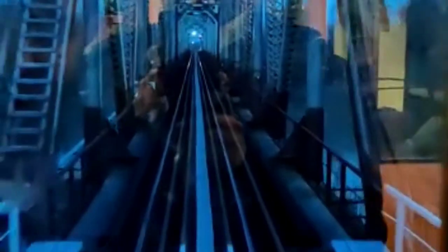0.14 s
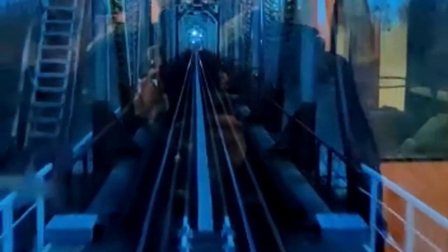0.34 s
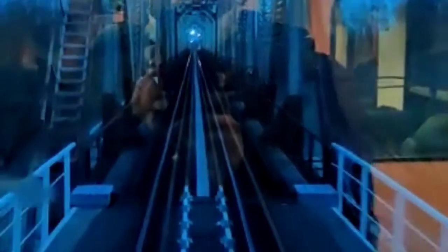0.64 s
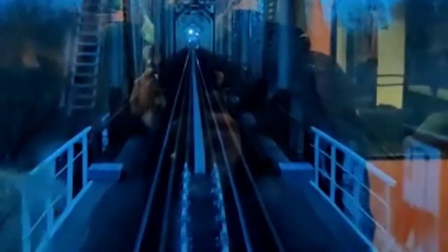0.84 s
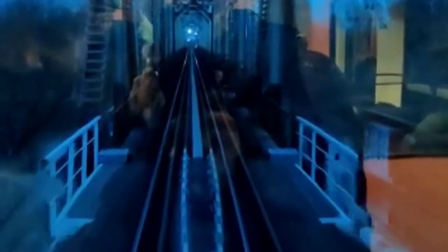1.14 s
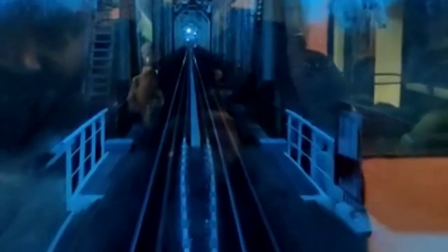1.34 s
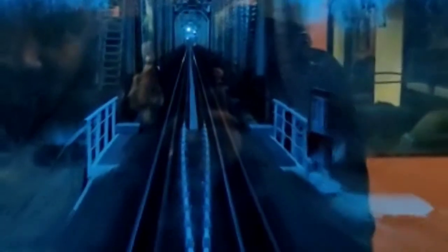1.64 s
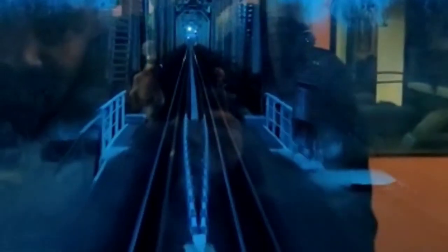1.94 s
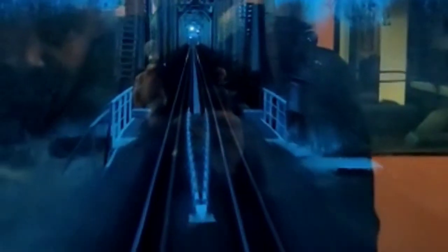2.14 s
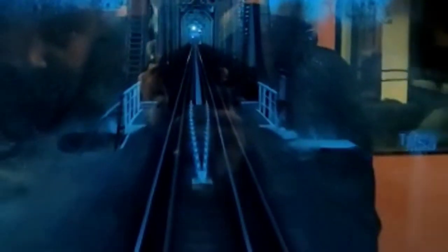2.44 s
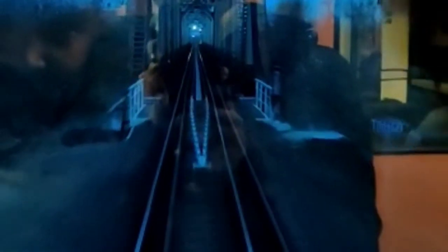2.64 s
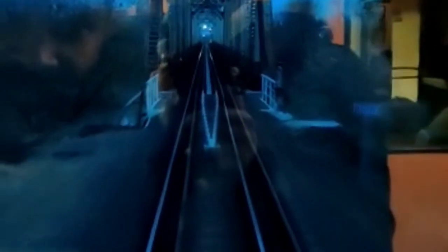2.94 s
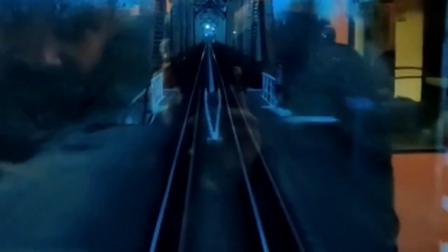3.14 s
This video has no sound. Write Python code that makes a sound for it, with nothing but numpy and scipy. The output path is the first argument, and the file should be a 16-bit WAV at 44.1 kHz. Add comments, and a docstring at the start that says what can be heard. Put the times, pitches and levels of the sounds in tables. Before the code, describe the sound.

Train rumble inside the rear car, continuous, low and rough, with body sway and muffled wheel roar. Bridge boom swells near 0.4 and 0.8 s. Clacks with thuds and brief steel ringing hit at 0.7, 1.0 (sharpest), 1.4 and 1.67 s, the last with a loud panel rattle. Later come deep thumps at 2.1 and 2.45, a duller knock with faint tinny rattle around 2.6-2.7, and unsteady low hum.

```python
"""Rear train car leaving a steel bridge

Inside the car: the body sways and floor modes drone (filtered noise), the bridge booms, the wheels roar
(shaped noise). Rail joints clack (hails of knocks with ring-out), jolts thump the floor (decaying sines),
loose fittings ping (fluttering sines), a hum comes forward on plain track. Two microphone ports:
the left is earlier, and louder below about 6 kHz."""
import sys
import numpy as np
from scipy import signal
from scipy.fft import rfft, irfft, next_fast_len
from scipy.io import wavfile
from scipy.ndimage import map_coordinates

SR = 44100
rng = np.random.default_rng(int(sys.argv[2]) if len(sys.argv) > 2 else 0)


def put_to_file(sound):
    """Save the sound as 16-bit audio at rate SR, in the file named by the first command-line argument."""
    columns = np.atleast_2d(sound).T  # one column per channel
    safe = np.clip(columns, -1, 1)
    whole_steps = np.round(safe * 32767)
    wavfile.write(sys.argv[1], SR, whole_steps.astype(np.int16))


def invert_db(x):
    """Field ratio 10**(x/20) for x, a level in decibels (scalar or array-like)."""
    u = np.asarray(x, float) / 20
    return 10 ** u


N = 145530

# body sway: (time [s], relative level [dB])
SWAY_LEVEL = [(0, -22), (.1, -28.5), (.62, -23), (.8, -15), (.9, -9), (1, -20), (1.06, -11), (1.2, -25),
              (1.64, -14.5), (1.9, -18), (2.42, -27), (2.52, -17.5), (2.85, -27.5), (3.3, -22)]
# floor drone and bridge boom: (time [s], relative drone level [dB], relative boom level [dB])
DRONE_LEVELS = [(0, -22.5, -33.5), (.25, -22, -32), (.42, -21.5, -19), (.68, -19.5, -28), (.83, -24, -13),
                (1.1, -22.5, -28.5), (1.75, -24, -25.5), (2.3, -24, -34), (3.3, -23.5, -42.5)]
# floor resonances: (frequency [Hz], width [Hz], relative level [dB])
FLOOR_MODES = [(29.8, 16.35, -2), (48, 8.4, -3.5), (67.8, 13.63, -3), (91.6, 16.7, -0.5),
               (124.1, 17.35, -6.5), (162.1, 19, -8), (216.2, 19.7, -10), (258.4, 18.1, -10.5),
               (365.6, 13.2, -15.5), (481.5, 24.5, -21.5)]
# wheel roar, its part above 600 Hz: (time [s], level [dB])
ROAR_LEVEL = [(0, -45), (.6, -43), (.95, -42.5), (1.25, -48.5), (1.6, -43), (1.85, -47.5), (2.75, -49),
              (2.95, -47.5), (3.3, -45)]
# roar spectrum: (frequency [Hz], relative density [dB per Hz])
ROAR_SPECTRUM = [(150, -32), (260, 2), (480, -3), (620, -9), (1000, -18), (1280, -16.5), (1550, -24.5),
                 (2400, -29.5), (3500, -37), (16000, -52)]
# wheels over joints: (time [s], level above 600 Hz [dB], length [s], tilt [dB per octave], thud boost [dB])
CLACKS = [(0.009, -38, 0.019, 2, -10.5), (.702, -33, 0.051, 2, 5), (0.965, -42, .02, 4.5, 2.5),
          (.98, -26, 0.037, 1.5, -3.5), (1.381, -35.5, .035, -2, 5), (1.657, -29.5, 0.036, -1.5, 6.5),
          (2.192, -51.5, 0.03, 7.5, -3.5)]
# clack spectrum: (frequency [Hz], relative density [dB per Hz])
CLACK_SPECTRUM = [(70, -40), (140, -8.5), (400, -7), (800, -18), (1250, -16), (1800, -26.5), (2500, -28.5),
                  (3600, -36), (16000, -48)]
# ring-out of the car: (frequency [Hz], t60 [s])
RING_OUT = [(200, 0.76), (1000, 0.35), (5000, 0.33), (12000, 0.13)]
# wheel and rail modes: (frequency [Hz], relative level [dB], t60 [s])
STEEL_MODES = [(1180, -5, 0.26), (1591, -7, 0.71), (1866, -9.5, 0.38), (2700, -7.5, 0.1)]
# jolts that knock a floor panel: (time [s], level [dB], frequency [Hz])
THUMPS = [(0.711, -12.5, 155.4), (1.003, -17.5, 164.5), (1.394, -20.5, 267.8), (1.68, -18, 263),
          (2.11, -11.5, 70.6), (2.224, -21.5, 73.8), (2.456, -12.5, 75), (2.714, -15, 135.8)]
# loose fittings and panels: (time [s], level [dB], frequency [Hz], t60 [s], pitch flutter [Hz])
PINGS = [(.012, -47, 4940, 0.18, 40), (.111, -55.5, 4300, 0.31, 40.2), (.137, -50.5, 4700, 0.17, 80),
         (.305, -53, 4790, 0.16, 250), (0.601, -55, 4470, 1, 222), (0.676, -50, 8260, 0.67, 703),
         (.708, -37.5, 4740, 0.18, 245), (.89, -53, 4740, 1, 179.6), (.988, -33.5, 4720, 0.12, 247),
         (1.382, -48.5, 4540, 0.082, 130), (1.672, -21.5, 778, 0.37, 99.5), (1.671, -27, 8300, .03, 457),
         (2.483, -45, 9200, .06, 202), (2.619, -35.5, 8990, 0.19, 51.5)]
# hum: (time [s], relative level [dB])
HUM_LEVEL = [(0, -40.5), (1.5, -28), (1.8, -23), (2.5, -30), (3.3, -25.5)]
# nominal left-right likeness: (frequency [Hz], likeness [1 = same])
ALIKE = [(50, 1), (110, 0.92), (210, 0.72), (400, 1), (800, 0.25), (5000, 0.14), (14000, 0.25)]
# nominal left minus right, scaled by the port sides: (frequency [Hz], level [dB])
TILT = [(25, 1.2), (150, 2), (1130, 0.5), (3000, 6), (4900, 7.5), (6500, -2)]
# microphone cavity: (frequency [Hz], gain [dB])
PORT_GAIN = [(3500, 0.5), (4800, 6), (5300, 1.5), (6000, -6), (7200, -10), (8400, -7), (10000, -14),
             (13300, -13), (15500, -28.5)]


def unit(x):
    """Scaled to rms 1."""
    return x / np.sqrt(np.mean(x ** 2) + 1e-20)


def along(points, hz):
    """Interpolates (frequency, value) points on a log frequency axis."""
    f, v = np.transpose(points)
    return np.interp(np.log(hz + 1), np.log(f + 1), v)


def curves(rows):
    """One value per sample for each column after the time."""
    s, *cols = np.transpose(rows)
    return [np.interp(np.arange(N) / SR, s, c) for c in cols]


def wobble(knots_per_s):
    """Smooth random curve through normal knots."""
    knots = rng.standard_normal(int(N * knots_per_s / SR) + 4)
    return map_coordinates(knots, [np.arange(N) * knots_per_s / SR])


def filtered(x, response):
    """x times a complex response of frequency."""
    n = x.shape[-1]
    m = next_fast_len(n + SR // 2)
    return irfft(rfft(x, m) * response(np.fft.rfftfreq(m, 1 / SR)), m)[..., :n]


def mode(f, hz, width_hz):
    """Response of one causal resonance."""
    return 1j * f * width_hz / (hz * hz - f * f + 1j * f * width_hz)


def wavering(hz, wander_hz):
    """Phase of a tone whose pitch drifts."""
    return 2 * np.pi * (np.cumsum(hz + wander_hz * wobble(9)) / SR + rng.random())


def sway():
    """The whole body heaves slowly on its springs: a wavering low sine."""
    level_db, = curves(SWAY_LEVEL)
    return invert_db(level_db + 2.5) * np.sin(wavering(hz=15, wander_hz=5.12))


def drone():
    """Rough rails shake the floor modes; the bridge booms underneath while it is near."""
    level_db, boom_db = curves(DRONE_LEVELS)

    def floor_response(f):
        # alternate signs between neighbouring modes
        return sum((-1) ** k * invert_db(db) * mode(f, hz, width_hz)
                   for k, (hz, width_hz, db) in enumerate(FLOOR_MODES))

    floor = filtered(rng.standard_normal((2, N)), floor_response)
    boom_gain = invert_db(boom_db + 1.0 + 1.2 * wobble(15))
    boom = boom_gain * np.sin(wavering(hz=47.47, wander_hz=2.55))
    return invert_db(level_db + 1.6 * wobble(11)) * unit(floor) + boom


def roar():
    """Wheel on rail, heard through the panels: noise with a shaped spectrum."""
    level_db, = curves(ROAR_LEVEL)
    whole_over_upper_db = 12  # whole roar over its part above 600 Hz
    noise = unit(filtered(rng.standard_normal((2, N)), lambda f: invert_db(along(ROAR_SPECTRUM, f))))
    return invert_db(level_db + whole_over_upper_db + 1.3 * wobble(9.3)) * noise


def clacks():
    """A hail of knocks rises, holds and thins; the car rings out, treble first; the steel sings along."""
    rise_s, grains_per_s, fade_db = 0.013, 1800, 5  # fade per clack length
    ring_db, steel_db, thud_hz = 1.5, -11.5, 530
    out, n = np.zeros((2, N + SR)), SR // 2
    t = np.arange(n) / SR
    for start_s, db, length_s, tilt_db, thud_db in CLACKS:
        hail = rng.standard_normal((2, n)) * (rng.random(n) < grains_per_s / SR)
        envelope = np.clip(t / rise_s, 0, 1) ** 2 * np.clip(2 - t / length_s, 0, 1)
        hail = unit(hail) * envelope * invert_db(-fade_db * t / length_s)

        hz, u, z = signal.stft(rng.standard_normal((2, n)), SR, nperseg=256)
        decay = invert_db(-60 * u / along(RING_OUT, hz)[:, None])
        tail = signal.istft(z * decay, SR, nperseg=256)[1][:, :n]
        wet = signal.fftconvolve(hail, tail / np.linalg.norm(tail[0]), axes=1)[:, :n]

        def colour(f):
            tilt = tilt_db * np.log2(np.maximum(f, thud_hz) / 1000)
            thud = thud_db / (1 + (f / thud_hz) ** 4)
            return invert_db(along(CLACK_SPECTRUM, f) + tilt + thud)

        upper_rms = np.std(filtered(rng.standard_normal(n), lambda f: colour(f) * (f > 600)))
        body = filtered(hail + invert_db(ring_db) * wet, colour) / upper_rms

        steel = sum(invert_db(mode_db + rng.normal(0, 2) - 60 * t / t60_s) * np.sin(2 * np.pi * mode_hz * t)
                    for mode_hz, mode_db, t60_s in STEEL_MODES)
        sing = signal.fftconvolve(hail, steel[None] / np.linalg.norm(steel), axes=1)[:, :n]
        out[:, round(start_s * SR):][:, :n] += invert_db(db) * (body + invert_db(steel_db) * sing)
    return out[:, :N]


def thumps():
    """A jolt swells in the floor panel and dies away: a decaying sine."""
    rise_s, t60_s = 0.022, 0.26
    start_s, db, hz = np.transpose(THUMPS)[:, :, None]
    t = np.maximum(np.arange(N) / SR - start_s, 0)
    envelope = invert_db(db - 60 * t / t60_s) * (1 - np.exp(-t / rise_s))
    return (envelope * np.sin(2 * np.pi * hz * t)).sum(0)


def pings():
    """Small metal parts squeak and chatter: a fluttering ring that dies away."""
    flutter_knots_per_s, rise_s = 700, 0.003
    out, n = np.zeros((2, N + SR)), SR // 2
    t = np.arange(n) / SR
    for start_s, db, hz, t60_s, flutter_hz in PINGS:
        flutter = np.array([wobble(flutter_knots_per_s)[:n], wobble(flutter_knots_per_s)[:n]])
        ring = np.sin(2 * np.pi * np.cumsum(hz + flutter_hz * flutter, axis=1) / SR)
        envelope = invert_db(db - 60 * t / t60_s) * (1 - np.exp(-t / rise_s))
        out[:, round(start_s * SR):][:, :n] += envelope * ring
    return out[:, :N]


def hum():
    """An unsteady hum with its octave comes forward on plain track."""
    level_db, = curves(HUM_LEVEL)
    phase = wavering(hz=65.07, wander_hz=1.499)
    fundamental = invert_db(2.7 * wobble(10)) * np.sin(phase)
    octave = invert_db(-7 + 2.5 * wobble(10)) * np.sin(2 * phase)
    return invert_db(level_db + 3.0) * (fundamental + octave)


def hiss(shape):
    """Preamp noise: a broad hump around 9 kHz, cut at 13.6 kHz."""
    noise = rng.standard_normal(shape)
    return invert_db(-72.5) * unit(filtered(noise, lambda f: mode(f, 9000, 7500) * (f < 13600)))


def scene():
    """Sum as a pair (part the ports share, part that differs); single-row sources enter both."""
    return sway() + drone() + hum() + thumps() + roar() + clacks() + pings()


def port(dry, side):
    """One microphone port, side > 0 left: cavity gain, level tilt, lead and mix of the pair."""
    lead_s = .00043  # left ahead of right for sides +1 and -1

    def response(f):
        turn = np.arccos(np.clip(along(ALIKE, f), -1, 1)) / 2
        gain = invert_db(along(PORT_GAIN, f) + side * along(TILT, f) / 2)
        lead = np.exp(.5j * side * 2 * np.pi * f * lead_s * (f > 250))
        return gain * lead * np.array([np.cos(turn), side * np.sin(turn)])

    return filtered(dry, response).sum(0)


def low_pass(x):
    """Removes everything above the highest recorded frequency."""
    return signal.sosfilt(signal.butter(12, 15700, fs=SR, output="sos"), x)


def record(dry):
    """Two ports hear the pair partly alike; the preamp hisses and rounds off the highest peaks."""
    top = .98
    x = np.array([port(dry, 0.94), port(dry, -0.88)]) + hiss(dry.shape)
    rounded = x / (1 + np.abs(x / top) ** 6) ** (1 / 6)
    return low_pass(rounded)


dry = scene()
out = record(dry)
put_to_file(out)
```